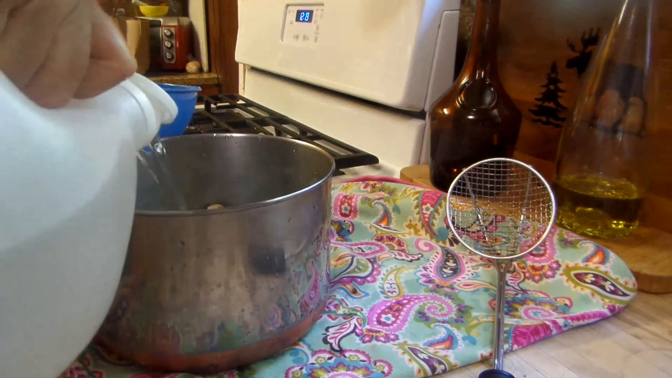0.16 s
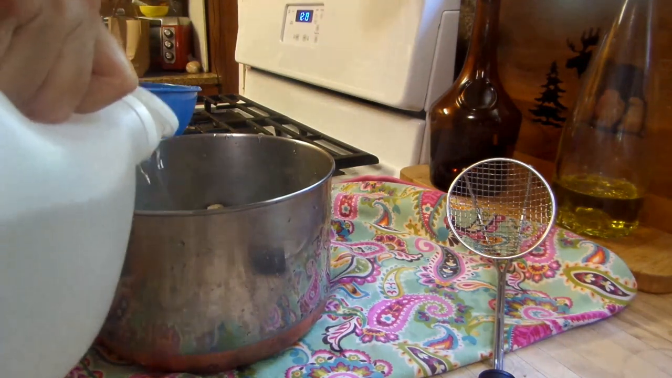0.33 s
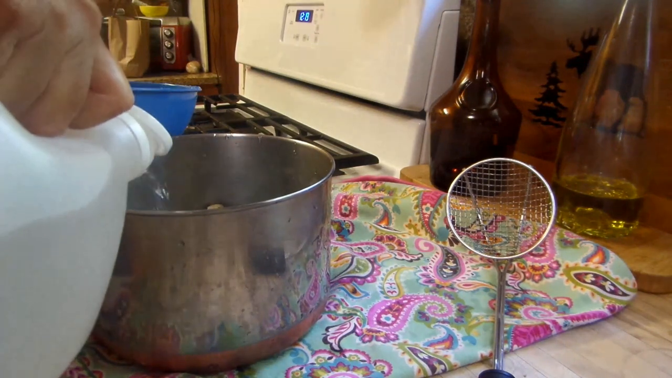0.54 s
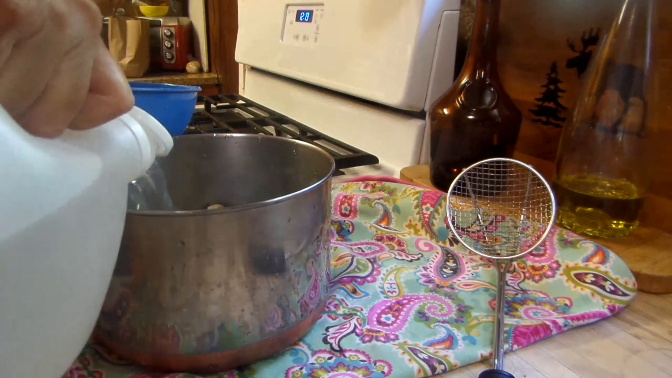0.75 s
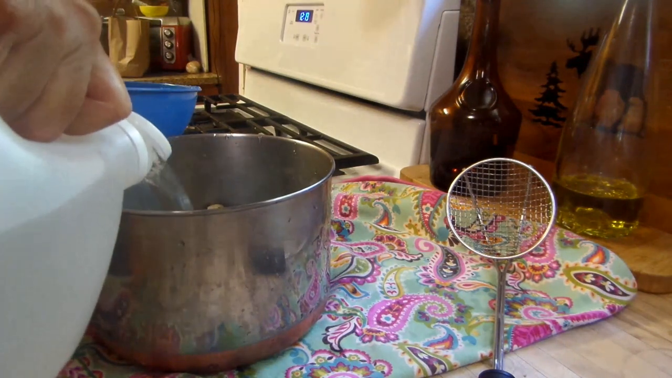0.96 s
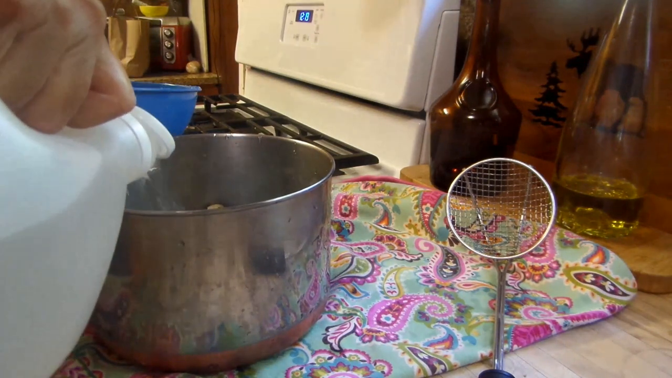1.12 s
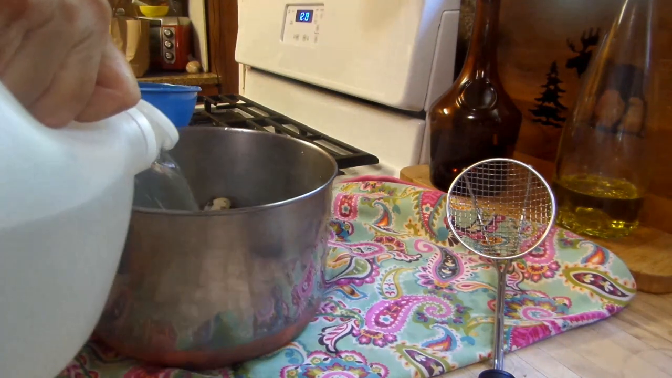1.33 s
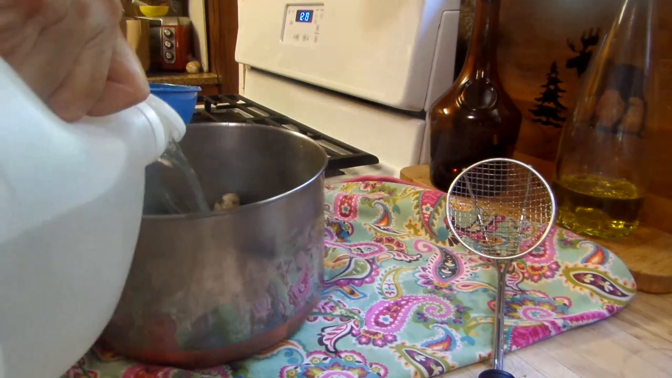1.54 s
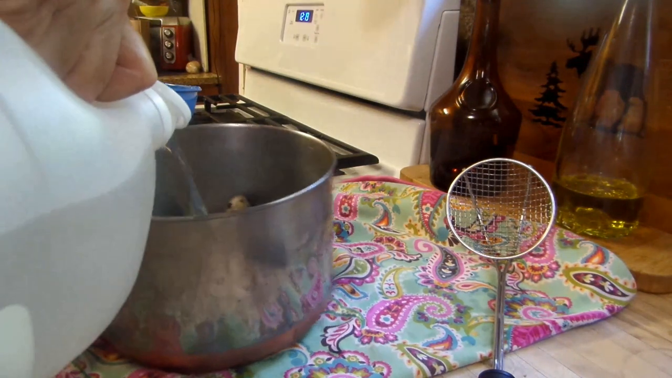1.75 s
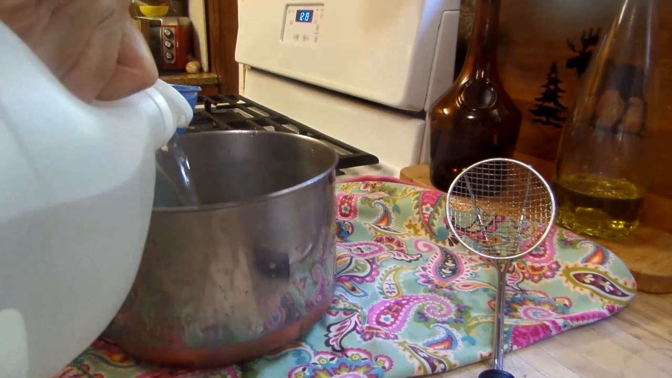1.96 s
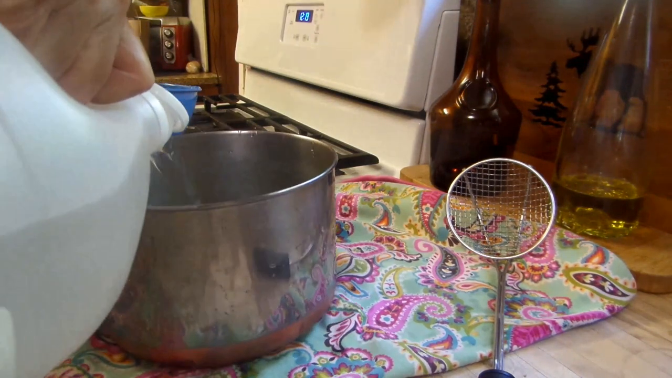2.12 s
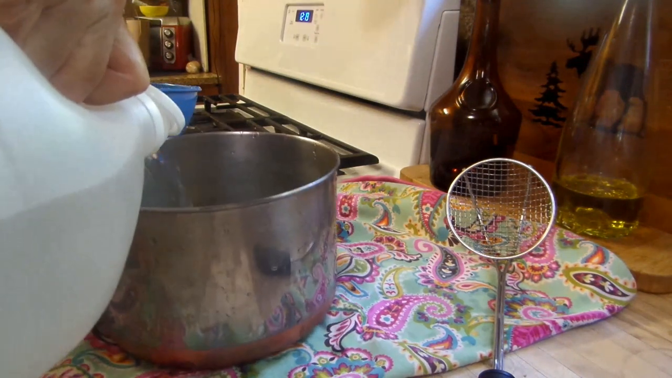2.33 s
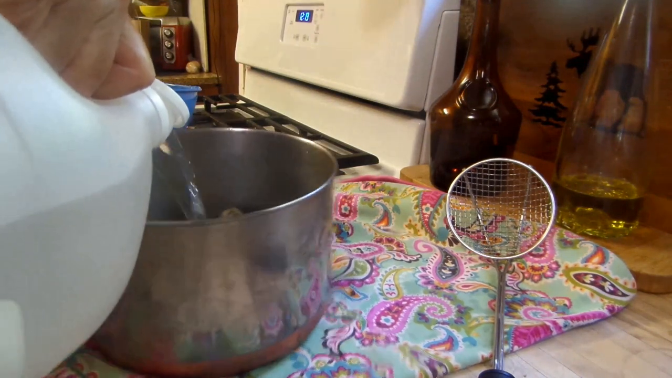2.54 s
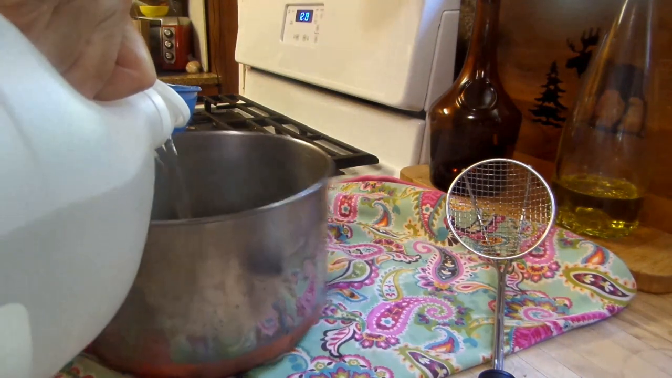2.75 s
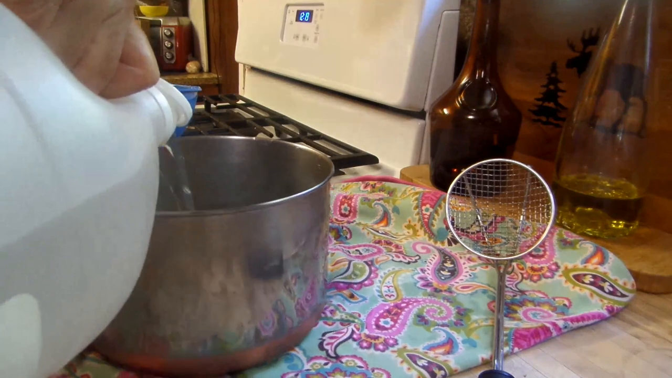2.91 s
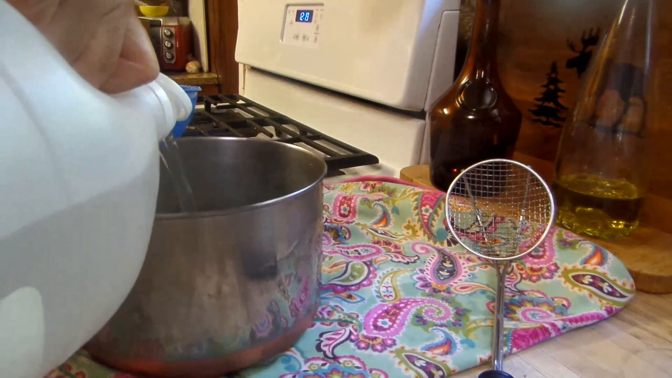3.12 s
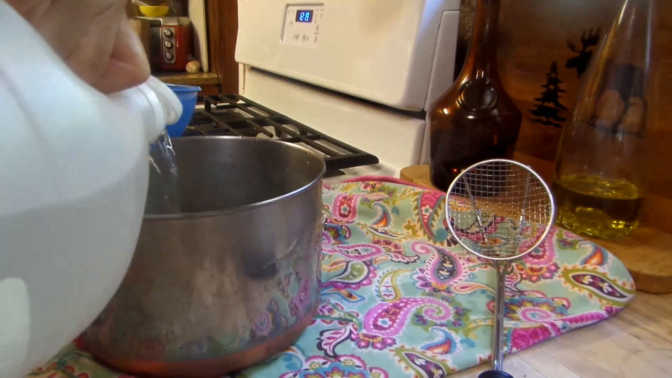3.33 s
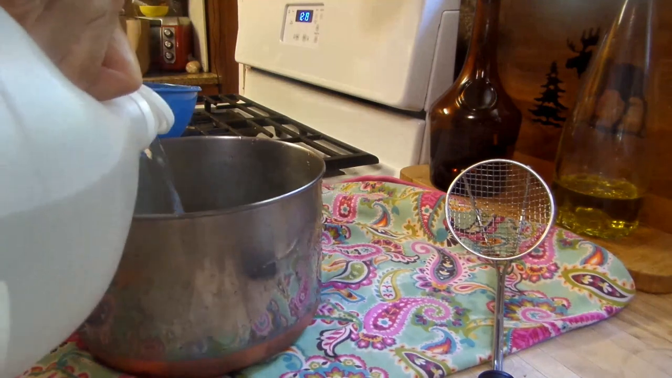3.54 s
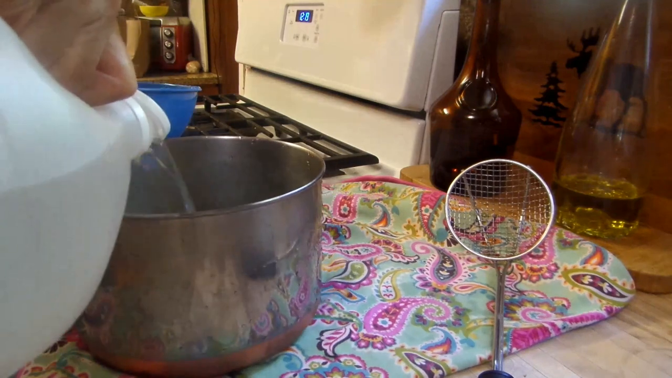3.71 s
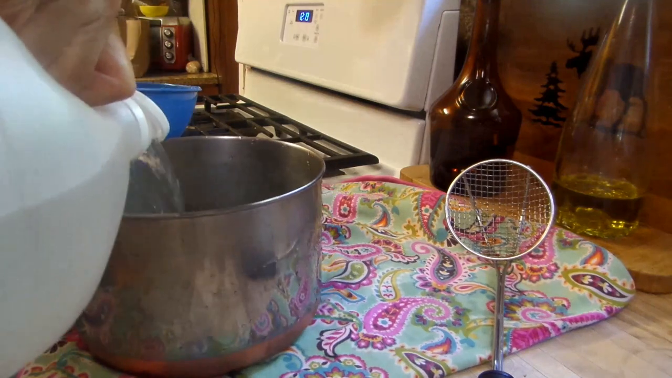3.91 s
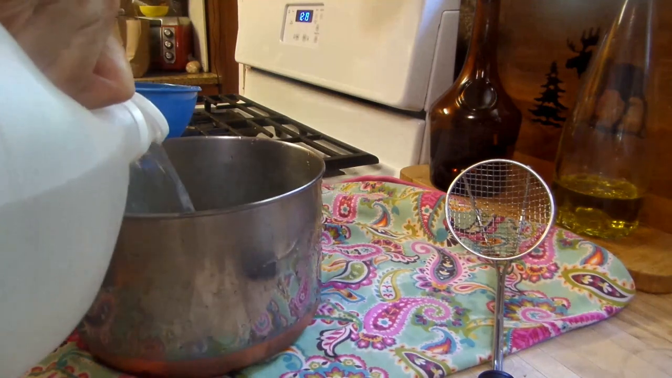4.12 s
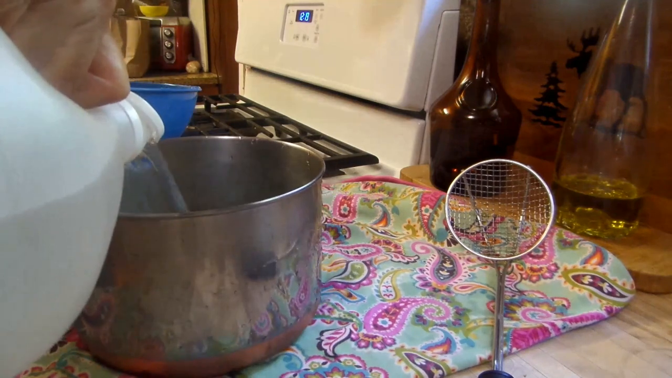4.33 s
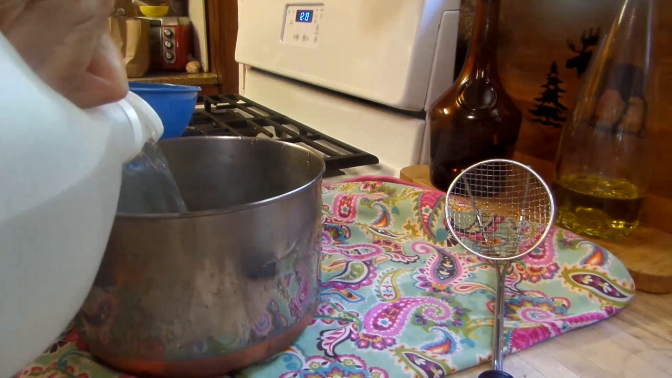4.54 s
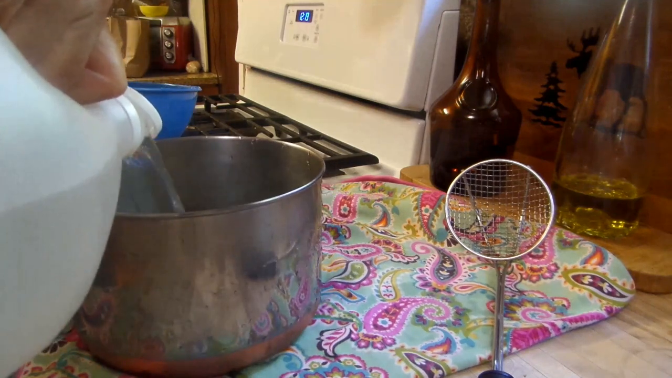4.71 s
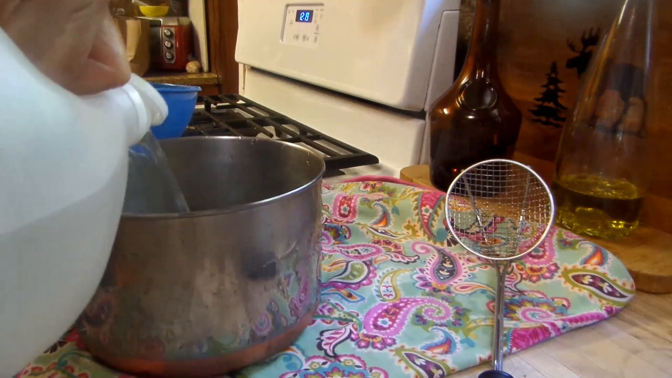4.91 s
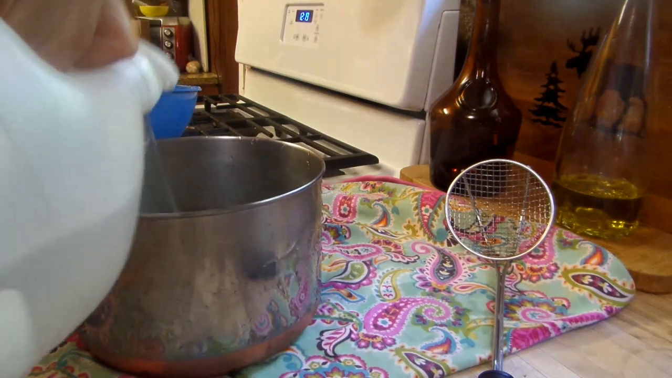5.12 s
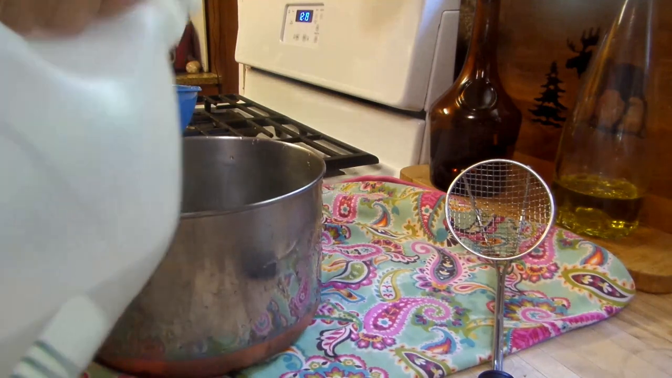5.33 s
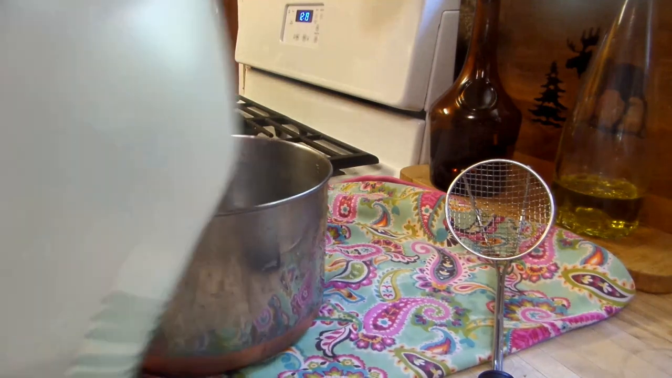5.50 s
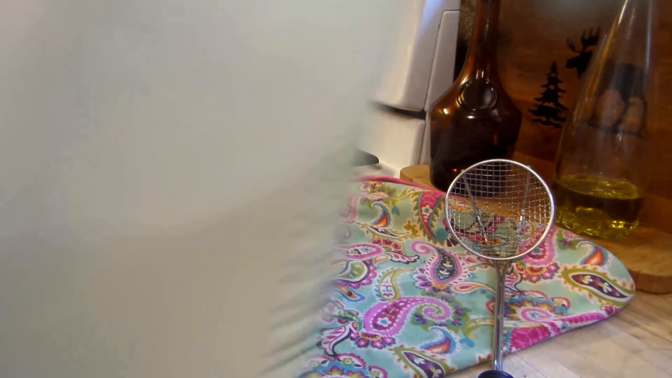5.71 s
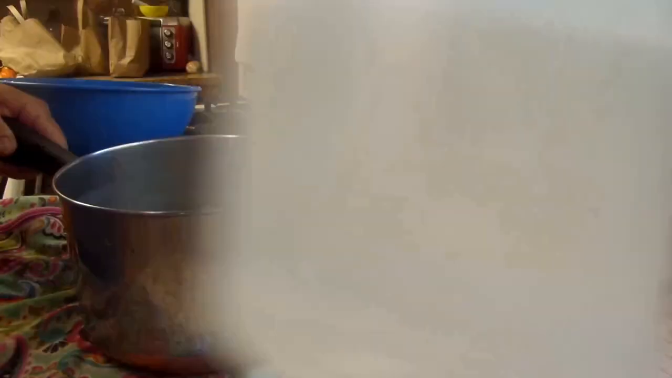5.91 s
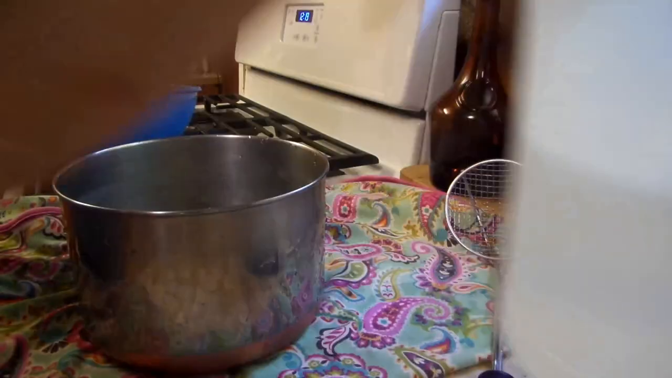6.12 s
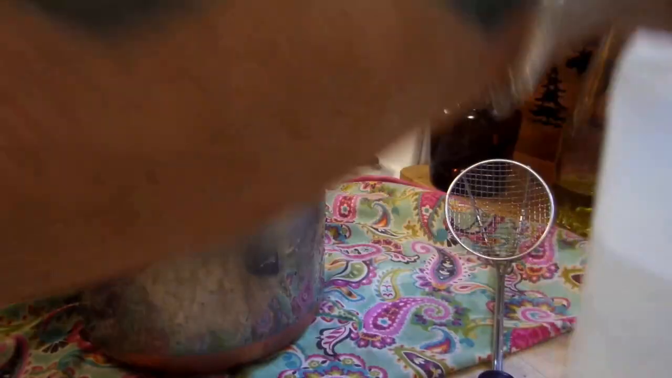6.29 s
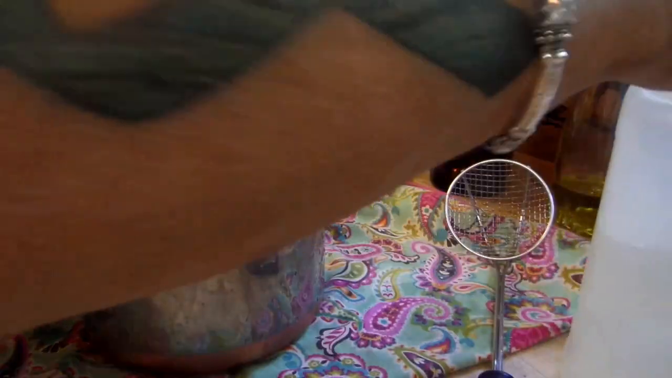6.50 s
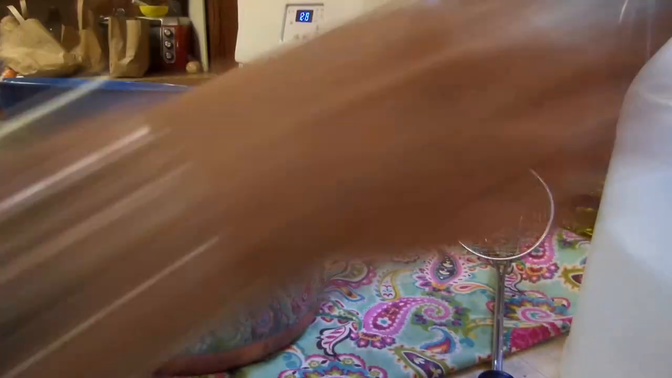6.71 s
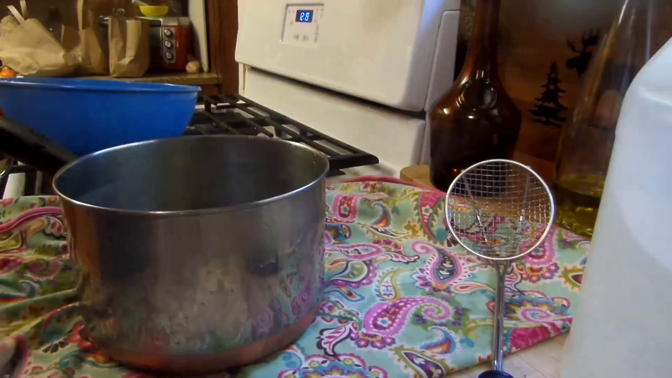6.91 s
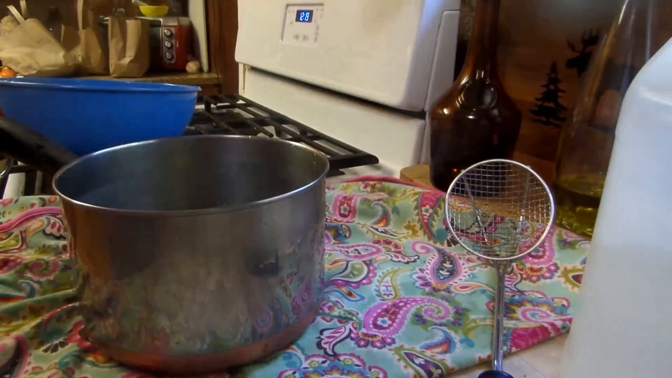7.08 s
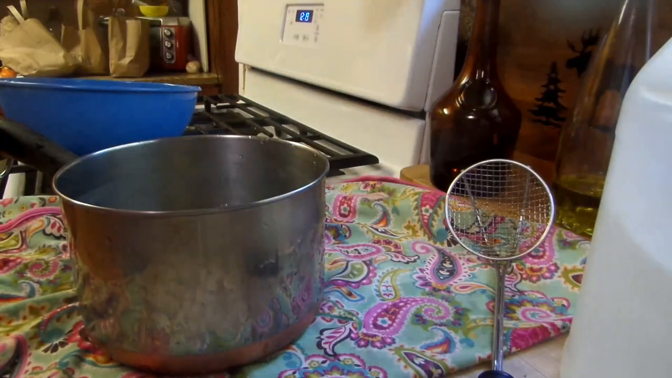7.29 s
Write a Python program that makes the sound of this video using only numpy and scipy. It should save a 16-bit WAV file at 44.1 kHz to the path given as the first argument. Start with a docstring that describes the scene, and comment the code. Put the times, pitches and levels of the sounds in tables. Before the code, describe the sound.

Splashy, gurgling pour into a metal pan, fading to trickles twice, then glugs, a pause and a heavy jug knocking down on a kitchen counter.

```python
"""Vinegar runs from a plastic jug into a steel saucepan in three surges with a trickle between them.
Clicks and short bubble tones make the splashing and gurgling; the pan adds its ring and echoes.
The jug glugs as it is righted, then lands on the counter in two quick bumps: low thumps and noisy cracks.
Its contents slosh in short noise bursts while an arm brushes past with a soft, grainy rustle.
Throughout, a fridge hums as two steady tones and filtered noise makes the air of the small kitchen."""
import sys
import numpy as np
from scipy import signal
from scipy.fft import rfft, irfft
from scipy.io import wavfile
from scipy.ndimage import uniform_filter1d

SR = 44100
rng = np.random.default_rng(int(sys.argv[2]) if len(sys.argv) > 2 else 0)


def dump(signal):
    """Clip the signal to [-1, 1] and save it as 16-bit WAV at the path in sys.argv[1]."""
    limited = np.clip(np.atleast_2d(signal).T, -1, 1)
    pcm = np.round(limited * 32767).astype(np.int16)
    wavfile.write(sys.argv[1], SR, pcm)


N = 324135
T = np.arange(N) / SR  # time of every sample in seconds

# Large pockets of air in the liquid. Each row: start in seconds, level in dB, pitch in Hz.
LARGE_BUBBLES = [(0.23, -32.5, 646), (0.85, -39.5, 605), (1.52, -33, 600), (1.644, -27.5, 558),
                 (1.674, -31, 642), (2.725, -30.5, 700), (2.936, -30.5, 853), (2.985, -33, 498),
                 (4.072, -28, 852), (4.478, -26, 706), (4.541, -31, 729), (4.632, -38, 820),
                 (4.96, -37, 750), (5.105, -35.5, 761), (5.376, -26.5, 767), (5.396, -25, 766)]


def undb(db):
    """Turn decibels into a gain."""
    return 10 ** (np.asarray(db) / 20)


def unit(x):
    """Scale a sound to an rms (average strength) of 1."""
    return x / np.sqrt(np.mean(x ** 2) + 1e-20)


def curves(table):
    """Draw straight lines between the rows of a time table: one value a sample for each column."""
    seconds, *columns = np.transpose(table)
    return [np.interp(T, seconds, column) for column in columns]


def convolve(x, response):
    """Pass a sound through an impulse response, the answer of an object or room to one click."""
    return signal.fftconvolve(x, response)[:len(x)]


def colour(x, points, size=4096):
    """Filter a sound through points of (Hz, dB), never sounding ahead of its input."""
    hz, db = np.transpose(points)
    bin_hz = np.arange(size // 2 + 1) * SR / size
    log_gain = np.log(undb(np.interp(np.log(bin_hz + 1), np.log(hz), db)))
    # Folding the cepstrum puts the filter's energy as early as possible.
    cepstrum = irfft(log_gain)
    cepstrum[1:size // 2] *= 2
    cepstrum[size // 2 + 1:] = 0
    return convolve(x, irfft(np.exp(rfft(cepstrum))))


def add(track, s, sound):
    """Mix a sound into a track at a time in seconds."""
    i = max(int(s * SR), 0)
    track[i:i + len(sound)] += sound[:max(N - i, 0)]


def fade(t60):
    """Die away by 60 dB in t60 seconds."""
    return undb(-60 * T[:int(t60 * SR) + 2] / t60)


def tail(t60):
    """Dense reflections: fading noise with a total energy of 1."""
    decay = fade(t60)
    y = decay * rng.standard_normal(len(decay))
    return y / np.linalg.norm(y)


def body(modes, ring_db, echo_db, echo_t60):
    """Impulse response of a vessel: direct sound, ringing modes and echoes, with a total energy of 1."""
    response = np.zeros(SR // 2)
    response[0] = 1  # direct sound
    for hz, t60, db in modes:
        decay = fade(t60)[:len(response)]
        ring = decay * np.cos(2 * np.pi * hz * T[:len(decay)]) / np.linalg.norm(decay)
        response[:len(decay)] += undb(db + ring_db) * ring
    echoes = tail(echo_t60)[:len(response)]
    response[:len(echoes)] += undb(echo_db) * echoes
    return response / np.linalg.norm(response)


def bubble(hz, cycles, glide):
    """A bubble rings for some cycles; its pitch rises by the share glide as it nears the surface."""
    decay = fade(cycles / hz)
    t = T[:len(decay)]
    return decay * np.sin(2 * np.pi * hz * (t + glide * t ** 2 * hz / cycles / 2))


def burst(length, grit_db, size=6000):
    """A cluster of tiny impacts swells fast and dies away; its energy is that of rms 1 for twice its length."""
    length = max(length, 1 / 2000)  # seconds
    age = T[:size] / length
    envelope = np.sqrt(age) * np.exp(-age)
    grit = undb(grit_db * np.repeat(rng.standard_normal(size // 20), 20))
    y = rng.standard_normal(size) * grit * envelope
    return y / np.linalg.norm(y) * np.sqrt(2 * SR * length)


def swarm(per_s, low_hz, high_hz, cycles, glide, spread_db, rise):
    """Random bubbles at random moments, later ones higher by up to the share rise as the pan fills; rms 1."""
    out = np.zeros(N)
    for when, pitch, size, life in rng.random((int(per_s * N / SR), 4)):
        hz = low_hz * (high_hz / low_hz) ** pitch * (1 + rise * when)
        gain = undb(-spread_db * np.sqrt(size))
        add(out, when * N / SR, gain * bubble(hz, cycles * (.5 + life), glide))
    return unit(out)


def impacts(per_s, spread_db):
    """Clicks at random moments, a few strong among many weak; rms 1."""
    when, size, sign = rng.random((int(per_s * N / SR), 3)).T
    clicks = np.sign(sign - .5) * undb(-spread_db * np.sqrt(size))
    return unit(np.bincount((when * N).astype(int), clicks, N))


def steady(x, seconds):
    """Even out the slow swells of a random texture but keep its grain; rms near 1."""
    return x / np.sqrt(np.abs(uniform_filter1d(x ** 2, int(seconds * SR) + 1)) + 1e-9)


def resonance(hz, width_hz):
    """Noise shakes a narrow resonance whose centre may move; rms 1."""
    pole = np.exp(-np.pi * width_hz / SR)
    shake = rng.standard_normal(N) + 1j * rng.standard_normal(N)
    shake = signal.lfilter([1], [1, -2 * pole, pole ** 2], shake)
    phase = 2 * np.pi * np.cumsum(hz * np.ones(N)) / SR
    return unit(np.real(shake * np.exp(1j * phase)))


def wander(per_s):
    """Random values, per_s of them a second, joined by straight lines."""
    times = np.arange(0, N / SR + 1, 1 / per_s)
    return 1.1 * np.interp(T, times, rng.standard_normal(len(times)))


def stream():
    """The jet breaks into spray and drops and drags air under; all follow its flow and the covered bottom."""
    # Strength of the stream as the jug tips. Each row: time in seconds, flow in dB.
    flow_table = [(0.04, -33.5), (0.078, 5.5), (0.36, 0), (0.6, -4.5), (0.85, 3.5), (1.0, -1.5),
                  (1.28, 0.5), (1.96, 0), (2.09, -13), (2.55, -12.5), (2.76, -1), (3.23, -1), (3.43, -14.5),
                  (3.65, -15), (4.0, -7.5), (4.11, -1.5), (4.78, -2), (5.05, -10), (5.39, -14),
                  (5.55, -25.5)]
    # Tone of each layer. Each row: frequency in Hz, level in dB.
    spray_tone = [(1200, -17.5), (2400, -17.5), (3300, 1.5), (4000, 0.5), (5000, 1), (6500, 4), (8200, 0.5)]
    patter_tone = [(120, -6), (310, -1), (430, -7), (600, -2), (950, -8.5), (1300, 0), (1800, -3),
                   (2400, 2.5), (3500, -8.5), (7000, -20.5)]
    gurgle_tone = [(150, -8.5), (350, -3), (500, -4), (750, 2), (1100, -1), (1500, -10.5), (3000, -37)]

    flow_db = curves(flow_table)[0]
    cover_s = 0.69  # the liquid covers the bottom of the pan with this time constant
    bare = np.exp(-T / cover_s)
    # The first number is the level at 0 dB of flow over a covered bottom.
    # A bare bottom drums more and gurgles less; only a strong jet drags air under.
    spray_gain = undb(-39.5 + flow_db)
    patter_gain = undb(-47.5 + 0.89 * flow_db + 6 * bare)
    gurgle_gain = undb(-43 + 1.42 * flow_db - 22 * bare) + clouds() * undb(flow_db)

    clumps = wander(85)  # shared by the layers, so they thicken together
    fizz = swarm(per_s=650, low_hz=2620, high_hz=7810, cycles=38, glide=0.056, spread_db=24.0, rise=0)
    spray = (impacts(per_s=1500, spread_db=24) + undb(-1.5) * fizz) * undb(2.0 * clumps)
    plinks = swarm(per_s=350, low_hz=1108, high_hz=3010, cycles=29.4, glide=0.18, spread_db=13.5, rise=0)
    patter = (impacts(per_s=900, spread_db=19) + undb(-9.0) * plinks) * undb(2.1 * clumps)
    gurgle = swarm(per_s=600, low_hz=359, high_hz=882, cycles=13.6, glide=0.15, spread_db=14.5, rise=0.38)
    gurgle = gurgle * undb(1.6 * clumps)

    layers = [(spray, spray_tone, spray_gain), (patter, patter_tone, patter_gain),
              (gurgle, gurgle_tone, gurgle_gain)]
    return sum(steady(colour(x, points), 0.14) * gain for x, points, gain in layers)


def clouds():
    """Strength of the small bubbles torn off by each glug, which swell and die away."""
    cloud_db, peak_s = -18.5, 0.019  # level against the glug, time to the peak
    out = np.zeros(N)
    age = T[:SR] / peak_s
    for s, db, _ in LARGE_BUBBLES:
        add(out, s, undb(db + cloud_db) * age * np.exp(1 - age))
    return out


def splats(count=4):
    """Big drops burst, trap a ringing bubble and throw droplets that fall back; lone drips only ring."""
    # Big drops. Each row: start in seconds, spray level in dB, bubble pitch in Hz, bubble level in dB.
    big_drops = [(0.0641, -32.5, 3750, -25), (0.129, -21.5, 5870, -13.5), (0.1333, -26, 4780, -13.5),
                 (0.6505, -41.5, 3860, -24), (0.6823, -34, 5000, -17), (0.8455, -26, 2240, -22.5),
                 (1.1548, -33, 3660, -23), (1.3126, -17.5, 3970, -15.5), (1.6337, -32.5, 6730, -21.5),
                 (1.7739, -37, 7400, -21), (2.729, -31.5, 5670, -26), (2.8374, -40, 3110, -26),
                 (2.993, -27, 4100, -24), (3.198, -37, 3980, -15), (4.1704, -32, 3750, -21),
                 (4.237, -32.5, 4230, -27), (4.3442, -29.5, 4630, -29), (4.4027, -30, 3580, -22),
                 (4.4419, -26.5, 3550, -17), (4.5455, -30, 3560, -24.5), (4.632, -32, 3300, -28),
                 (4.6978, -31, 5500, -15)]
    # Lone small bubbles and drips. Each row: start in seconds, level in dB, pitch in Hz.
    lone_drips = [(2.136, -28, 6600), (2.3217, -33.5, 2320), (2.5353, -35.5, 2340), (3.4674, -31, 7160),
                  (3.706, -35, 1510), (5.0547, -31.5, 4760), (5.3307, -31.5, 5280), (5.655, -43, 1900),
                  (6.185, -39, 3840)]
    droplet_db = 4.5  # against the spray
    lowest_hz, range_hz = 2990, 4570  # droplet pitches
    flight_s, flight_spread_s = 0.0052, 0.026  # shortest flight, longest extra time

    spray, rings = np.zeros(N), np.zeros(N)
    for s, db, hz, bubble_db in big_drops:
        add(spray, s, undb(db) * burst(0.0026, grit_db=3.0))
        add(rings, s + 0.000981, undb(bubble_db) * bubble(hz, cycles=45, glide=0.065))
        for lag, pitch in rng.random((count, 2)):
            droplet = bubble(lowest_hz + range_hz * pitch, cycles=37, glide=0.092)
            add(rings, s + flight_s + flight_spread_s * lag, undb(db + droplet_db) * droplet)
    for s, db, hz in lone_drips:
        add(rings, s, undb(db) * bubble(hz, cycles=38, glide=0.095))
    splash_tone = [(150, -7.5), (1800, -7.5), (3800, 2.5), (8000, 3)]  # (Hz, dB)
    return colour(spray, splash_tone) + rings


def saucepan(x, echo_db, ring_db=-18.5, echo_t60=0.061, count=5):
    """The steel rings at fixed modes; the echoes inside keep changing as the surface heaves."""
    # Steel wall and the air in the pan. Each row: pitch in Hz, time to fade by 60 dB in seconds, level in dB.
    pan_modes = [(507, 0.082, -9.5), (644, 0.086, -5.5), (1255, 0.066, -0.5), (1887, 0.11, 2.5),
                 (2340, 0.067, -3.5), (3294, 0.2, -5), (4040, 0.16, -4), (4850, 0.15, -13.5),
                 (5200, 0.078, -13), (7780, 0.15, 0.5)]
    direct_and_ring = convolve(x, body(pan_modes, ring_db=ring_db, echo_db=-19.5, echo_t60=echo_t60))
    # Drift between several echo patterns while their total power stays even.
    weights = np.array([wander(14) for _ in range(count)])
    weights /= np.linalg.norm(weights, axis=0)
    echoes = sum(convolve(x * weight, tail(echo_t60)) for weight in weights)
    return (direct_and_ring + undb(echo_db) * echoes) / np.hypot(1, undb(echo_db))


def glugs():
    """Large pockets of air pinch off and ring low; the churning liquid makes each one waver."""
    out = np.zeros(N)
    for s, db, hz in LARGE_BUBBLES:
        ring = bubble(hz, cycles=70, glide=0.065)
        soft_start = 1 - np.exp(-T[:len(ring)] / 0.0032)
        add(out, s, undb(db) * ring * soft_start)
    churn = 1 + 0.64 * resonance(60, width_hz=140)
    return colour(out * churn, [(200, -7.5), (500, -1.5), (900, -1.0), (2500, -23.5)])


def drone():
    """Noise-shaken resonances make the hollow low note under the pour and a deeper rumble that dies away."""
    # The hollow note. Each row: time in seconds, pitch in Hz, level in dB.
    note_table = [(0, 115, -55), (4.2, 116.8, -53.5), (5.1, 122.3, -49), (5.7, 126.6, -58)]
    # The rumble. Each row: time in seconds, level in dB.
    rumble_table = [(1.5, -57.5), (1.9, -62.5), (6, -70.5)]
    hz, note_db = curves(note_table)
    note = undb(note_db) * steady(resonance(hz, width_hz=14.0), 0.13)
    rumble = undb(curves(rumble_table)[0]) * resonance(68, width_hz=16)
    return note + rumble


def jug():
    """The heavy jug lands on one edge, then flat: its base thumps, its shell cracks, the liquid slaps the wall."""
    # Contacts with the counter. Each row: start in seconds, thump level in dB, thump pitch in Hz,
    # thump length in seconds, crack level in dB, contact length in seconds.
    knocks = [(6.4749, -10, 161.5, 0.018, -8, 0.0064), (6.575, -8.5, 164.8, 0.026, -10.5, 0.01),
              (6.604, -22.5, 260, 0.025, -17.5, 0.0056), (6.648, -19.5, 141, 0.014, -30.5, 0.0056)]
    # Plastic shell and counter. Each row: pitch in Hz, time to fade by 60 dB in seconds, level in dB.
    shell_modes = [(480.6, 0.2, 0), (583.4, 0.16, 0.5), (834, 0.11, -5), (1250, .14, -6.5),
                   (1536, 0.076, -9), (1765, 0.16, -11), (2530, .16, -13)]
    # Tone of the cracks. Each row: frequency in Hz, level in dB.
    crack_tone = [(80, -37), (170, 2), (290, 7.5), (430, -1), (800, -1), (1500, 0.5), (2500, -3),
                  (3500, -5.5), (8000, -21)]
    # Liquid slaps and small handling taps. Each row: start in seconds, level in dB, centre in Hz,
    # length in seconds (the shortest is raised to 0.0005).
    slosh_table = [(5.702, -33.5, 1460, 0.00054), (6.006, -50, 4000, .003), (6.181, -48, 5000, 0.0095),
                   (6.236, -49, 4500, 0.0057), (6.281, -52, 4000, 0.0076), (6.619, -18, 447, 0.011),
                   (6.677, -27.5, 496, 0.018), (6.694, -31, 2210, 0.0093), (6.717, -30, 1520, 0.013),
                   (6.77, -34.5, 2050, 0.0099), (6.925, -38, 550, 0.011), (7.035, -26, 397, 0.0093),
                   (7.069, -28.5, 1000, 0.0045)]

    thumps, cracks, slaps = np.zeros(N), np.zeros(N), np.zeros(N)
    t = T[:SR // 2]
    for s, thump_db, hz, thump_s, crack_db, contact_s in knocks:
        # The soft base flexes, then the counter stops it.
        load = (1 - np.exp(-t / .005)) * np.exp(-(t / thump_s) ** 2)
        add(thumps, s, undb(thump_db) * load * np.sin(2 * np.pi * hz * t))
        dulling = [(1500, 0), (8000, -600 * contact_s)]  # a longer contact is duller
        add(cracks, s, undb(crack_db) * colour(burst(contact_s, grit_db=2.5), dulling))

    # The liquid-loaded base rings on after the first bump.
    base_hz, base_db, base_t60_s, base_lag_s = 141, -21.5, 0.44, 0.028
    decay = fade(base_t60_s)
    base_ring = decay * np.sin(2 * np.pi * base_hz * T[:len(decay)])
    add(thumps, knocks[0][0] + base_lag_s, undb(base_db) * base_ring)

    for s, db, hz, length in slosh_table:
        band = [(hz / 8, -18), (hz / 2, -2), (hz, 2.5), (hz * 3, -13), (hz * 10, -32)]
        add(slaps, s, undb(db) * colour(burst(length, grit_db=4), band))
    shell = body(shell_modes, ring_db=-23, echo_db=-12.5, echo_t60=0.21)
    return thumps + convolve(colour(cracks, crack_tone) + slaps, shell)


def rustle():
    """The arm brushes past: dense tiny clicks give a fine, soft grain."""
    # Strength of the brushing. Each row: time in seconds, level in dB.
    rustle_table = [(6.7, -64.5), (7.04, -54.5), (7.11, -46), (7.2, -58), (7.35, -47)]
    # Tone of the brushing. Each row: frequency in Hz, level in dB.
    rustle_tone = [(100, -6), (300, -0.5), (850, -5), (1500, -7.5), (4000, -10.5), (8000, -18.5)]
    grain = unit(colour(impacts(per_s=5000, spread_db=11.5), rustle_tone))
    return grain * undb(curves(rustle_table)[0])


def kitchen(x):
    """Add short reverberation (fading noise echoes), the air of the room and the fridge's steady tones."""
    # Tone of the room's air. Each row: frequency in Hz, level in dB.
    air_tone = [(25, -11.5), (85, -11), (125, -12), (220, -3), (320, -6.5), (450, -11), (700, -17),
                (2000, -28.5), (4000, -34), (8000, -30)]
    # Fridge tones. Each row: pitch in Hz, rms level in dB.
    fridge_tones = [(120, -62.5), (297, -62)]
    echoes = np.r_[np.zeros(SR // 200), tail(.42)]  # they start after 5 ms
    wet = colour(convolve(x, echoes), [(100, -6.5), (400, 0.5), (8000, -2.5)])
    air = unit(colour(rng.standard_normal(N), air_tone)) * undb(-53)
    hum = sum(np.sqrt(2) * undb(db) * np.sin(2 * np.pi * hz * T) for hz, db in fridge_tones)
    return x + undb(-10.0) * wet + air + hum


def scene():
    """Mix everything heard from beside the pan."""
    pour = saucepan(stream(), echo_db=2.0) + saucepan(splats(), echo_db=-0.5) + glugs() + drone()
    return kitchen(pour + jug() + rustle())[None]


def record(dry):
    """A small microphone rounds the loudest peaks and cuts off the highest treble."""
    top_hz = 8080
    rounded = .5 * np.tanh(dry / .5)
    low_pass = signal.ellip(12, .2, 70, top_hz, fs=SR, output="sos")
    return signal.sosfilt(low_pass, rounded)


dry = scene()
out = record(dry)
dump(out)
```